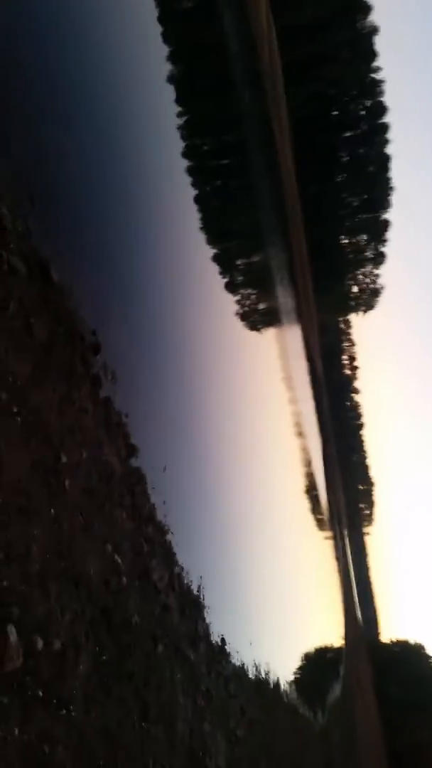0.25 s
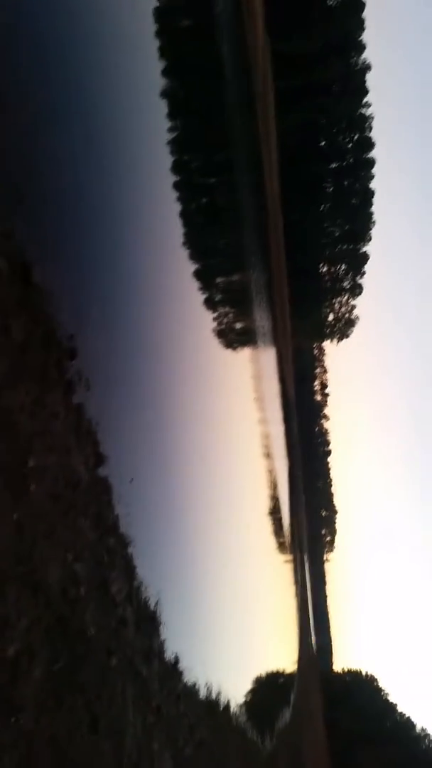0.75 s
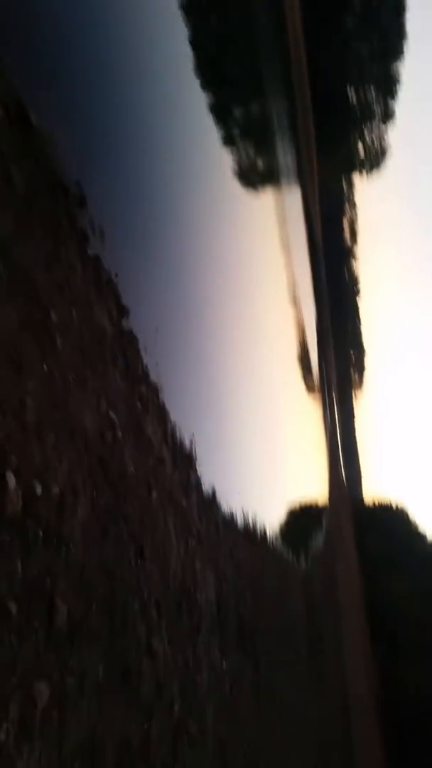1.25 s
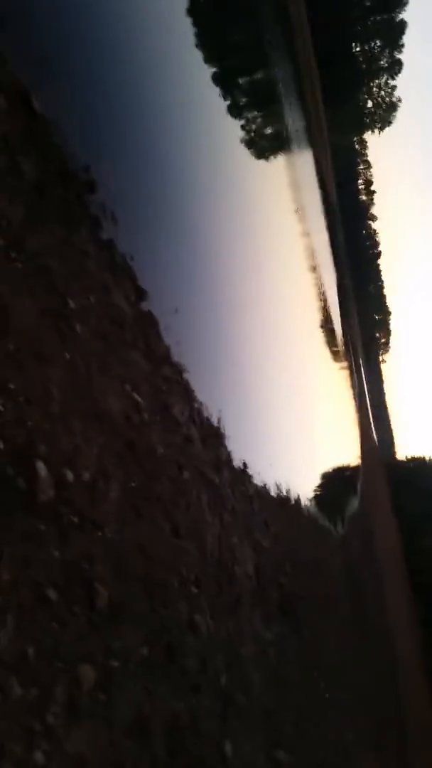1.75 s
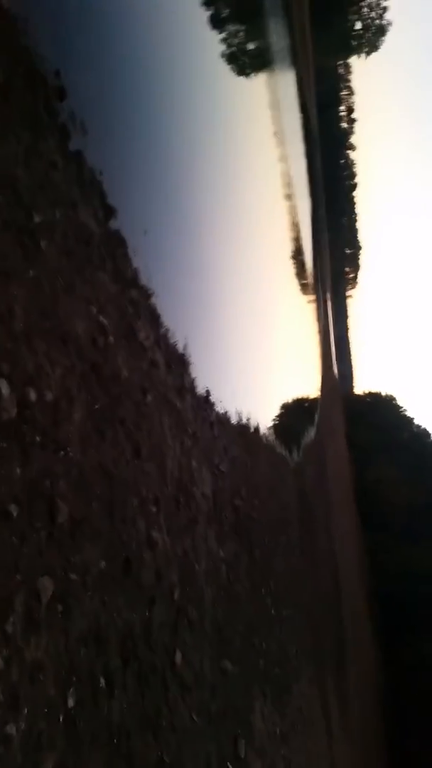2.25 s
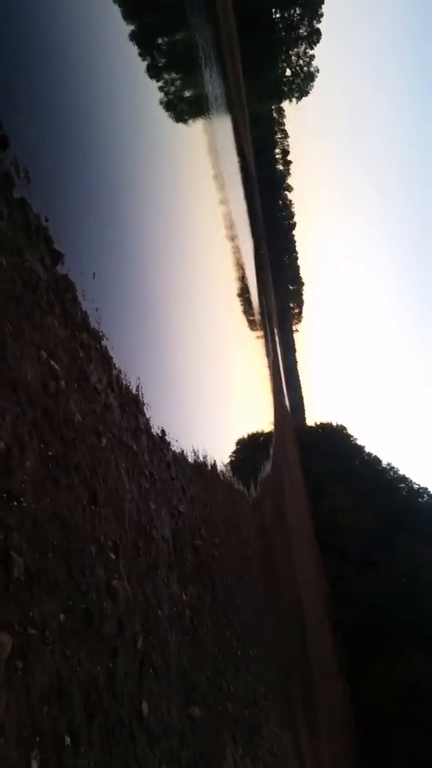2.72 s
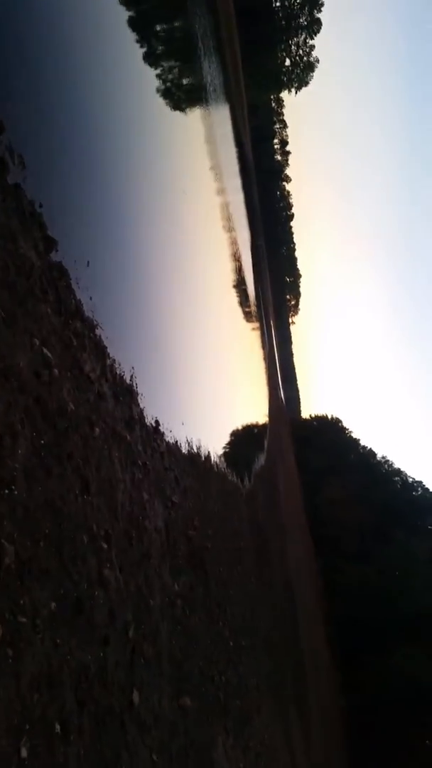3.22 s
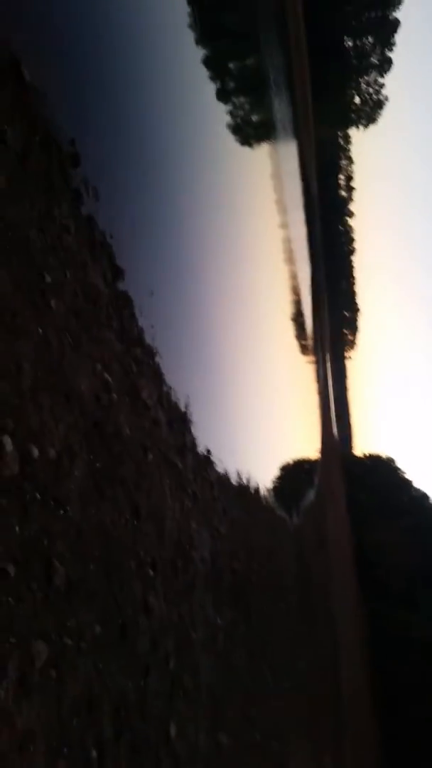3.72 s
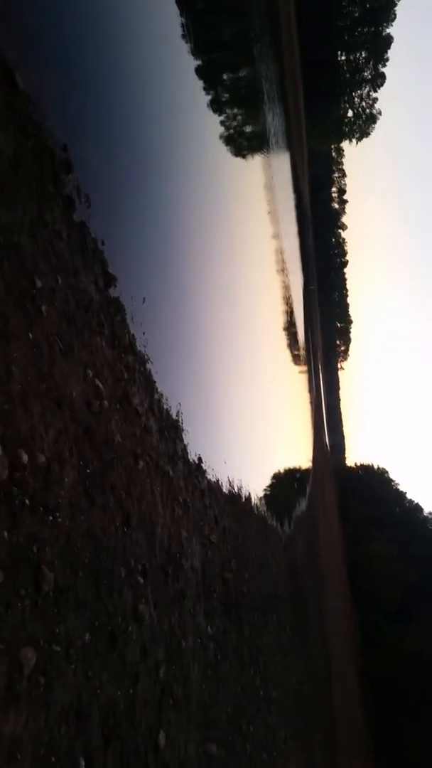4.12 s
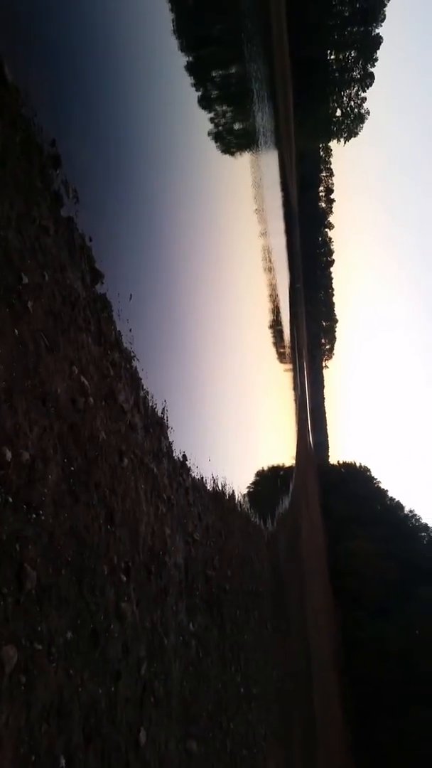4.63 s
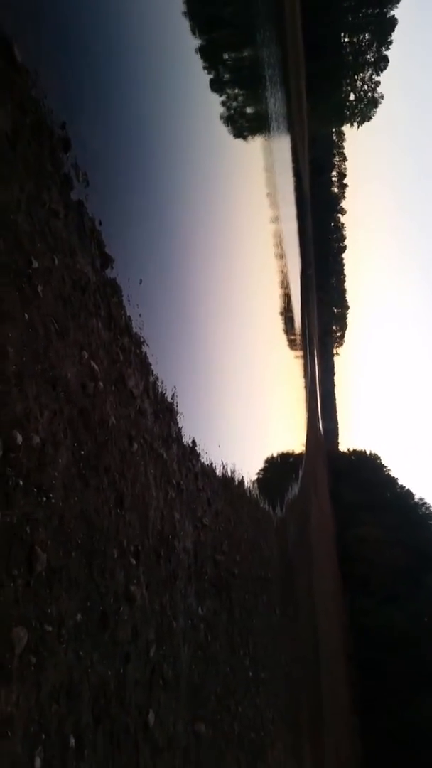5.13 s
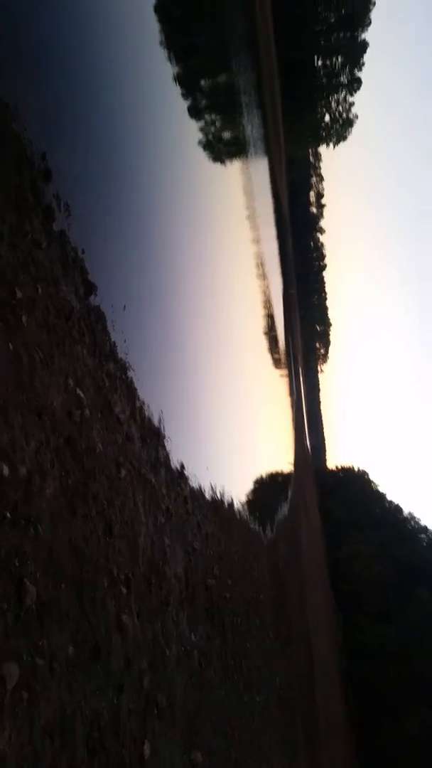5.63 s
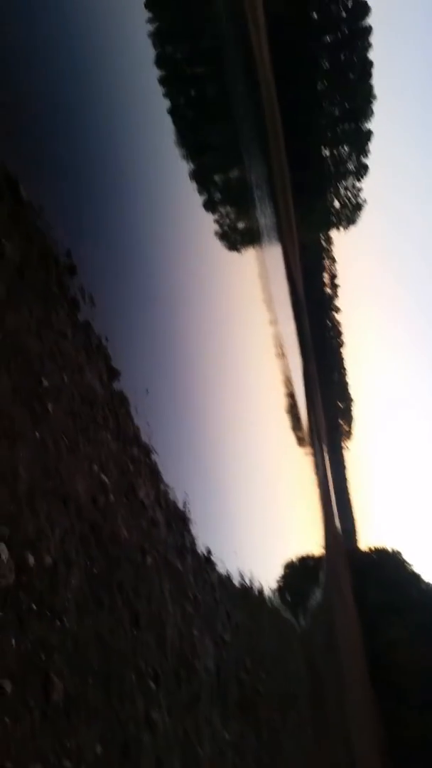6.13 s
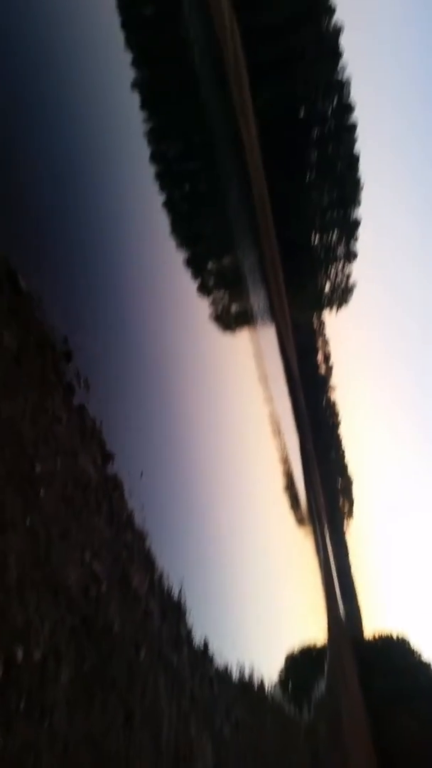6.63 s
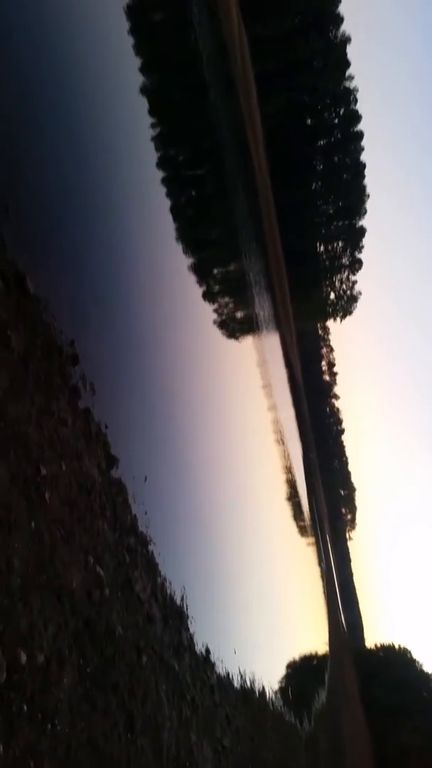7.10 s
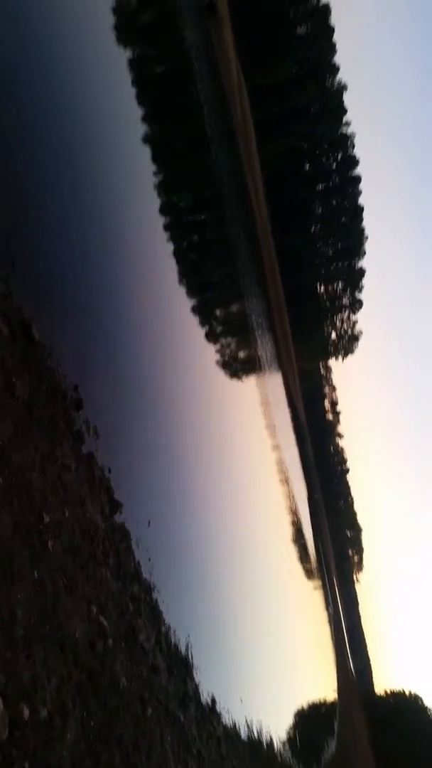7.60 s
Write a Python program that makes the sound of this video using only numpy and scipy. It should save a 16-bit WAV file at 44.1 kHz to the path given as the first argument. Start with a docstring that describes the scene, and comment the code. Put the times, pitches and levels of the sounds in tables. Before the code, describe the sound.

Steady shrill insect chorus on the left at a quiet lakeshore, with faint engine hum, early finger scrapes and clicks, and soft wind buffeting.

```python
"""Lake shore at dusk, with handling noise

A shrill, even hiss like a far insect chorus, mostly on the left, is banded noise with a few chirps.
A distant engine hums in wavering low tones; open air, a late far rush and thin squeaks lie around it.
Fingers shift on the hand-held recorder: grains and noise rub, swish and scrape, short pulses click.
A light breeze, low noise in gusts, buffets the right of its two microphone ports.
Soft thumps, from touches on the case or gusts at the right port, are brief decaying swings."""
import sys
import numpy as np
from scipy import signal
from scipy.fft import rfft, irfft
from scipy.io import wavfile

SR = 44100
rng = np.random.default_rng(int(sys.argv[2]) if len(sys.argv) > 2 else 0)


def materialize(psi):
    """Save the field psi as 16-bit PCM at rate SR to the path in sys.argv[1].

    A 1-D psi becomes a single channel; in a 2-D psi each row is a channel.
    """
    bounded = np.clip(np.atleast_2d(psi).T, -1, 1)
    quanta = np.round(bounded * 32767).astype(np.int16)
    wavfile.write(sys.argv[1], SR, quanta)


N = 346626  # length in samples

# Level of the shrill hiss and open air, with rises at 0.87 and 3.63 s where fingers scrape:
# time_s, level_db (before port gains)
HISS_AND_AIR_LEVEL = [(0.0, -62), (0.68, -62), (0.87, -57), (1.18, -62), (1.58, -60.5), (1.97, -63),
                      (2.23, -59.5), (2.74, -63.5), (3.35, -64), (3.63, -58), (3.87, -62), (5.21, -60),
                      (5.45, -58.5), (5.93, -62), (6.39, -64.5), (7.14, -66), (7.6, -63), (7.86, -63.5)]


def from_db(db):
    """Decibels to gain."""
    return 10 ** (np.asarray(db) / 20)


def rms_one(x):
    """Scale to rms 1."""
    return x / np.sqrt(np.mean(x ** 2) + 1e-20)


def level(rows):
    """Gain at every sample, gliding in dB between rows of time_s, level_db."""
    return from_db(np.interp(np.arange(N) / SR, *np.transpose(rows)))


def coloured(x, colour):
    """Give a signal a spectrum of frequency_hz, relative_db points with ends that fall away; rms 1."""
    hz, db = np.transpose(colour)
    f = np.arange(N // 2 + 1) * SR / N + 1e-3
    ends = np.minimum(f / hz[0], 1) ** 2 * np.minimum(hz[-1] / f, 1) ** 2
    shape = from_db(np.interp(np.log(f), np.log(hz), db))
    return rms_one(irfft(rfft(x) * ends * shape, N))


def noise(colour):
    """Smooth noise with the given spectrum."""
    return coloured(rng.standard_normal(N), colour)


def drift(rate_hz):
    """A random wander of rms 1 that takes a new course rate_hz times a second."""
    knots = rng.standard_normal(8000)
    return rms_one(np.interp(np.arange(N) / SR * rate_hz, np.arange(len(knots)), knots))


def grains(per_s, spread_db):
    """Tiny slips of uneven size and either sign at random moments."""
    happens = rng.random(N) < per_s / SR
    return happens * rng.choice([-1, 1], N) * from_db(spread_db * rng.standard_normal(N))


def swell(peak_s, rise_s, fall_s):
    """A smooth rise to 1 and a fall; each time reaches from the peak to 1/e."""
    t = np.arange(N) / SR - peak_s
    away = np.minimum(np.abs(t / np.where(t < 0, rise_s, fall_s)), 10)
    return np.exp(-away ** 1.41)  # power 1 = pointed swells, 2 = rounded ones


def place(x, left_db, right_db):
    """Feed one sound to the two ports."""
    return np.outer(from_db([left_db, right_db]), x)


def add(out, s, sound):
    """Mix a short stereo sound in at time s."""
    start = round(s * SR)
    out[:, start:start + sound.shape[1]] += sound[:, :N - start]


def air(left_db=4.5, right_db=2.5, rush_db=-67.5):
    """The wide hush of the shore as separate noise at each port, and a far rush that swells late."""
    # Spectra of the open air at each port, and of the rush: frequency_hz, relative_db (per Hz)
    left_colour = [(20, 4.5), (50, -8), (110, 4), (170, -0.5), (260, -6.5), (450, -10.5), (900, -17),
                   (2000, -22), (5000, -40.5), (8500, -32.5), (10500, -30.5), (12500, -24.5), (15500, -23)]
    right_colour = [(20, -13), (110, 0.5), (200, -7.5), (300, -6.5), (450, -11.5), (900, -15),
                    (2000, -20.5), (3500, -25), (6000, -30.5), (8200, -32), (9800, -22.5), (12500, -22),
                    (15500, -20.5)]
    rush_colour = [(400, -25), (700, 8), (880, 13), (1200, -2), (2000, -23.5), (4000, -35)]
    hush = np.array([from_db(left_db) * noise(left_colour), from_db(right_db) * noise(right_colour)])
    rush_gain = from_db(rush_db) * swell(peak_s=7.78, rise_s=0.25, fall_s=0.3)
    return level(HISS_AND_AIR_LEVEL) * hush + rush_gain * place(noise(rush_colour), -11, 0)


def chorus(left_db=6.5, right_db=-17.7, shimmer_db=0.85, chirp_width_s=0.097, flutter_hz=25, faint_count=14):
    """Many far voices blur into one shrill noise band; now and then a single fluttering chirp stands out."""
    # Spectrum of the blurred voices: frequency_hz, relative_db (per Hz)
    colour = [(1800, -23.5), (2900, -15.5), (3300, -11), (3600, -7), (3950, 0.5), (4200, 1), (4550, -0.5),
              (4900, -4.5), (5400, -11.5), (6000, -18), (7500, -27.5), (9500, -49)]
    # Nearer chirps: centre_s, pitch_hz, peak_db (before port gains)
    near_chirps = [(1.0, 4460, -74), (2.4, 4310, -72)]
    t = np.arange(N) / SR
    left = noise(colour) * from_db(left_db + shimmer_db * drift(30))
    right = noise(colour) * from_db(right_db)
    out = level(HISS_AND_AIR_LEVEL) * np.array([left, right])

    flutter_cycles = np.cumsum(flutter_hz * drift(120)) / SR
    # faint chirps come at random, spread around 4400 Hz
    faint_chirps = [(rng.uniform(0, N / SR), 4400 + 100 * rng.standard_normal(), -79)
                    for _ in range(faint_count)]
    for s, hz, db in near_chirps + faint_chirps:
        near = np.abs(t - s) < 3 * chirp_width_s
        tone = np.sin(2 * np.pi * (hz * t[near] + flutter_cycles[near]))
        envelope = np.exp(-((t[near] - s) / chirp_width_s) ** 2)
        out[:, near] += place(from_db(db) * tone * envelope, 2.7, 1.6)
    return out


def engine(wander=0.0042, waver_db=1.1):
    """A few low tones carried across the water, wavering together in pitch and separately in level."""
    # Level of the hum, before the tone levels: time_s, level_db
    hum_level = [(0, -55), (.6, -64.5), (1.9, -69), (2.6, -58), (3.2, -62), (4.3, -53), (4.7, -54.5),
                 (5.3, -52), (6.2, -60.5), (6.7, -66), (7.1, -65.5), (7.86, -55)]
    # Its tones: pitch_hz, left_db, right_db
    hum_tones = [(84.4, -12.5, -9.5), (138.4, -2.5, -0.5), (260.2, -21.5, -20), (275.7, -23.5, -21)]
    wavering_time = np.cumsum(1 + wander * drift(8)) / SR
    tones = np.zeros((2, N))
    for hz, left_db, right_db in hum_tones:
        tone = np.sin(2 * np.pi * hz * wavering_time) * from_db(waver_db * drift(9))
        tones += place(tone, left_db, right_db)
    return np.sqrt(2) * level(hum_level) * tones  # the root makes levels rms


def squeaks(jitter_hz=85, flicker_db=1.5):
    """Thin, unsteady whistles, each a short glide that swells and fades."""
    # Glides: start_s, length_s, first_hz, last_hz, peak_db (before flicker and port gains)
    glides = [(7.355, .07, 8750, 9000, -80), (7.485, 0.044, 9000, 9150, -71),
              (7.495, .045, 13000, 13650, -67), (7.523, .11, 9900, 9400, -71),
              (7.635, .07, 9250, 9050, -74)]
    out = np.zeros((2, N))
    jitter = jitter_hz * drift(500)
    flicker = from_db(flicker_db * drift(60))
    for s, length, first_hz, last_hz, db in glides:
        span = np.arange(round(s * SR), min(round((s + length) * SR), N))
        pitch = np.linspace(first_hz, last_hz, len(span)) + jitter[span]
        gain = from_db(db) * np.sin(np.linspace(0, np.pi, len(span))) * flicker[span]
        whistle = np.sin(2 * np.pi * np.cumsum(pitch) / SR)
        add(out, s, place(gain * whistle, -15, 1.5))
    return out


def breeze(attack_s=0.02, release_s=0.033, lull_db=-64.5):
    """Each gust rises, holds and dies away: eddies press on the right port, separate weak ones on the left."""
    # Spectrum of wind on a port: frequency_hz, relative_db (per Hz)
    colour = [(12, -34), (28, -3), (58, 1.5), (80, -1), (120, -6), (170, -17), (260, -33), (500, -46.5),
              (1500, -53.5)]
    # Gusts: start_s (middle of the rise), length_s (until the release), level_db (before port gains)
    gusts = [(0.047, 0.38, -51.5), (.56, .16, -49.5), (0.713, 0.24, -42.5), (0.926, 0.052, -34.5),
             (1.142, 0.25, -45.5), (1.452, 0.069, -35.5), (1.683, 0.073, -36.5), (2.098, 0.054, -37),
             (2.2, .55, -54), (2.922, 0.67, -55), (3.52, 0.23, -52), (3.753, 0.031, -44.5),
             (4.108, .19, -44), (4.322, 0.38, -47), (4.797, 0.095, -36.5), (5.008, .3, -41.5),
             (5.128, 0.058, -31.5), (5.395, 0.22, -37.5), (5.66, 0.3, -54.5), (6.02, 0.18, -51.5)]
    t = np.arange(N) / SR
    power = from_db(lull_db) ** 2
    for s, length, db in gusts:
        attack = np.clip((t - s) / attack_s + .5, 0, 1)
        release = np.exp(-np.clip((t - s - length) / release_s, 0, 20))
        power = power + (from_db(db) * attack * release) ** 2
    eddies = np.array([from_db(-28) * noise(colour), from_db(-0.5) * noise(colour)])
    return np.sqrt(power) * eddies


def bumps(tap_db=-15, tap_cycles=0.94, brightness=2.33, swing_cycles=4.8):
    """Soft thumps, from touches on the case or gusts at the right port, swing for a few cycles."""
    # Thumps: start_s, left_db, right_db, swing_hz
    thumps = [(0.1531, -27.5, -40, 290), (.158, -22, -39, 205), (.553, -34, -48, 814),
              (.612, -31.5, -45, 680), (.617, -25, -42, 123), (1.463, -53, -23, 63.5),
              (1.506, -53, -22, 95), (1.663, -15, -39, 193), (1.761, -42, -18.5, 81),
              (2.0363, -20, -39, 646), (2.038, -19, -45, 118), (3.368, -28.5, -43, 252)]
    out, t = np.zeros((2, N)), np.arange(SR // 5) / SR
    for s, left_db, right_db, hz in thumps:
        # the swing falls by 60 dB in swing_cycles
        swing = np.sin(2 * np.pi * hz * t) * from_db(-60 * hz * t / swing_cycles)
        # the lower the swing, the duller its tap
        dull = signal.butter(4, brightness * hz, fs=SR, output="sos")
        tap_noise = rms_one(signal.sosfilt(dull, rng.standard_normal(len(t))))
        tap = tap_noise * np.exp(-hz * t / tap_cycles)
        onset = 1 - np.exp(-6 * hz * t)
        add(out, s, place(onset * (swing + from_db(tap_db) * tap), left_db, right_db))
    return out


def clicks(leak_hz=85, ring_hz=12160, ring_peak_s=0.00009, rise_s=.00008):
    """A fingertip snaps on the port: a pressure step that leaks away and undershoots, with a brief ring."""
    # Snaps: start_s, step_db and ring_db (before shaping and port gains), half_decay_s (half the time constant)
    snaps = [(.8617, -35, -33, .0003), (0.8697, -15.5, -6.5, 0.00068), (.8860, -14, -19, .0006),
             (0.8882, -27, -11.5, 0.00025), (0.8915, -11, -12, 0.0014), (2.0373, -32, -26, 0.00058)]
    out, t = np.zeros((2, N)), np.arange(SR // 20) / SR
    leak = signal.butter(2, leak_hz, "high", fs=SR, output="sos")
    ring_envelope = (t / ring_peak_s) * np.exp(1 - t / ring_peak_s)
    ring = np.sin(2 * np.pi * ring_hz * t) * ring_envelope
    for s, step_db, ring_db, half_decay_s in snaps:
        pressure = 2 * np.exp(-t / (2 * half_decay_s)) * (1 - np.exp(-t / rise_s))
        step = signal.sosfilt(leak, pressure)
        add(out, s, place(from_db(step_db) * step + from_db(ring_db) * ring, -34, -6.5))
    return out


def strokes(scrape_law=0.96):
    """The pressure of each stroke drives rub, slide and scrape, each scuff the first two; returns three gains."""
    # Finger strokes, before port gains: peak_s, rise_s, fall_s, rub_db (on the case),
    # slide_db (over the right port), scrape_db
    stroke_rows = [(.16, .25, .2, -59, -72, -90), (.618, .008, .085, -51, -51.5, -85),
                   (.77, .07, .05, -43.5, -44, -59), (.93, 0.29, 0.061, -44.5, -66, -64),
                   (1.18, 0.065, 0.093, -62, -62, -92), (1.54, 0.28, 0.095, -54, -68, -85),
                   (1.56, .035, 0.13, -47.5, -50, -71), (1.681, 0.046, 0.048, -36, -49, -48),
                   (1.749, 0.06, 0.012, -34, -46.5, -49.5), (2.04, 0.043, 0.033, -41.5, -47.5, -53),
                   (2.169, 0.14, 0.17, -50, -47, -59.5), (2.74, 0.2, 0.05, -56, -76, -90),
                   (3.378, 0.02, 0.037, -48.5, -59.5, -85), (3.5, 0.073, 0.077, -49, -57.5, -76),
                   (3.68, 0.099, 0.067, -50.5, -50.5, -63), (3.79, .05, 0.14, -68.5, -62, -80)]
    # Short scuffs of skin, before port gains: peak_s, slide_db, rub_db
    scuff_rows = [(.195, -55, -59), (.238, -58.5, -62), (.31, -58, -54), (.36, -55, -54), (.384, -61, -62),
                  (.409, -56.5, -57), (0.531, -58, -50.5), (.577, -53.5, -51), (1.469, -49.5, -60)]
    power = np.zeros((3, N))
    for s, rise, fall, rub_db, slide_db, scrape_db in stroke_rows:
        pressure = swell(s, rise, fall)
        rub = from_db(rub_db) * pressure
        slide = from_db(slide_db) * pressure
        scrape = from_db(scrape_db) * pressure ** scrape_law
        power += np.square([rub, slide, scrape])
    for s, slide_db, rub_db in scuff_rows:
        scuff = swell(s, rise_s=0.0074, fall_s=0.0074)
        power[:2] += np.outer(from_db([rub_db, slide_db]), scuff) ** 2
    return np.sqrt(power)


def rubbing(gain, judder_db=2.0):
    """Skin sticks and slips on the case near the left port, which answers with a dull rumble."""
    # Spectrum of the rumble: frequency_hz, relative_db (per Hz)
    colour = [(25, -21), (60, -1.5), (110, 3), (185, 1.5), (232, 4.5), (265, -4.5), (350, -1), (440, -2.5),
              (620, -10.5), (920, -10.5), (1150, -27.5), (2000, -33), (3500, -32.5), (5000, -30.5),
              (8000, -55)]
    slips = grains(per_s=3000, spread_db=2.5) * from_db(judder_db * drift(120))
    return gain * place(coloured(slips, colour), 2.04, -12.5)


def sliding(gain, grit_db=2.0, catch_db=1.25, brush_s=0.14):
    """Skin over the right port excites its high resonance with uneven noise; light brushes are smoother."""
    # Spectra of sliding skin and of a light brush: frequency_hz, relative_db (per Hz)
    slide_colour = [(300, -16), (1000, -16), (2000, -15.5), (4200, -14), (5500, -30), (7500, -46),
                    (8500, -19.5), (9300, -3), (10200, 5.5), (11200, 1), (12500, -1), (14000, -5.5),
                    (15700, -9.5)]
    brush_colour = [(7000, -26), (9300, -11), (10200, 0), (11200, 5.5), (12200, 2), (13200, -15),
                    (15700, -22)]
    # Light, airy brushes: peak_s, level_db (before port gains)
    brush_rows = [(5.86, -55.5), (7.49, -71)]
    brush_gain = sum(from_db(db) * swell(s, brush_s, brush_s) for s, db in brush_rows)
    unevenness = from_db(grit_db * drift(250) + catch_db * drift(45))
    friction = rms_one(noise(slide_colour) * unevenness)
    return place(gain * friction + brush_gain * noise(brush_colour), -38, 0.54)


def scraping(gain, judder_db=1.0):
    """Under firm pressure the skin grates in dense slips, coloured separately by each port."""
    # Spectra of a hard-pressed finger at each port: frequency_hz, relative_db (per Hz)
    left_colour = [(200, -6), (420, 1), (600, -2), (900, 7.5), (1300, -9.5), (2000, -13), (3200, -24),
                   (4300, -2), (6000, -39), (9000, -49)]
    right_colour = [(200, 2.5), (380, -1.5), (700, -6), (1300, -19), (3000, -19), (4400, -22), (5600, -47),
                    (7300, -26.5), (8500, -16.5), (9500, -6.5), (11000, -20), (15000, -32)]
    judder = from_db(judder_db * drift(150))
    left = coloured(grains(per_s=5400, spread_db=1.5) * judder, left_colour)
    right = coloured(grains(per_s=5200, spread_db=1.5) * judder, right_colour)
    return gain * np.array([from_db(3.0) * left, from_db(3.5) * right])


def scene():
    """The shore, and the breeze, thumps and fingers at the ports."""
    shore = air() + chorus() + engine() + squeaks()
    rub, slide, scrape = strokes()
    fingers = clicks() + rubbing(rub) + sliding(slide) + scraping(scrape)
    return shore + breeze() + bumps() + fingers


def record(dry):
    """A steep elliptic low-pass cuts the top above 15850 Hz."""
    low_pass = signal.ellip(12, .1, 70, 15850, fs=SR, output="sos")
    return signal.sosfilt(low_pass, dry)


dry = scene()
out = record(dry)
materialize(out)
```